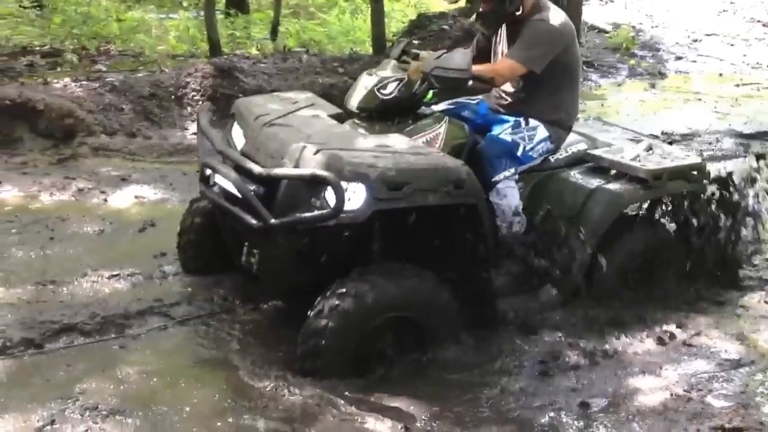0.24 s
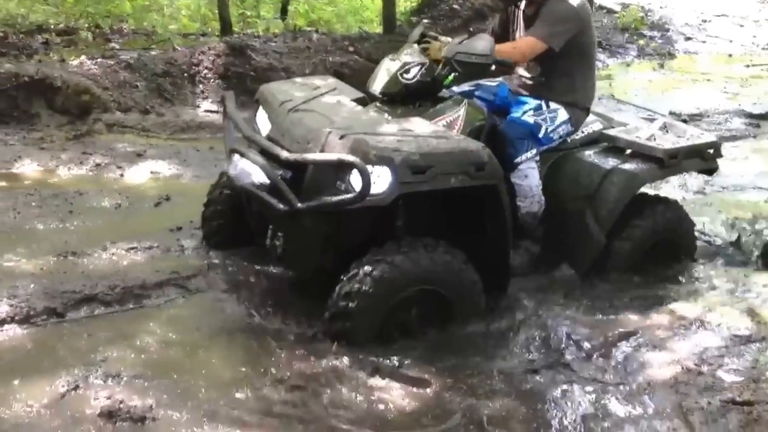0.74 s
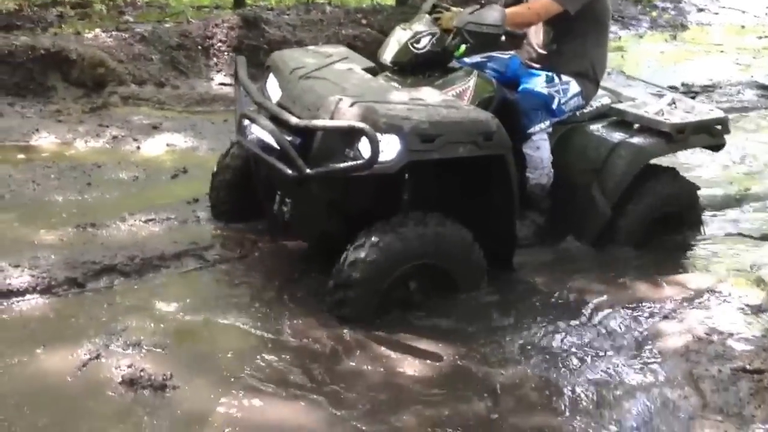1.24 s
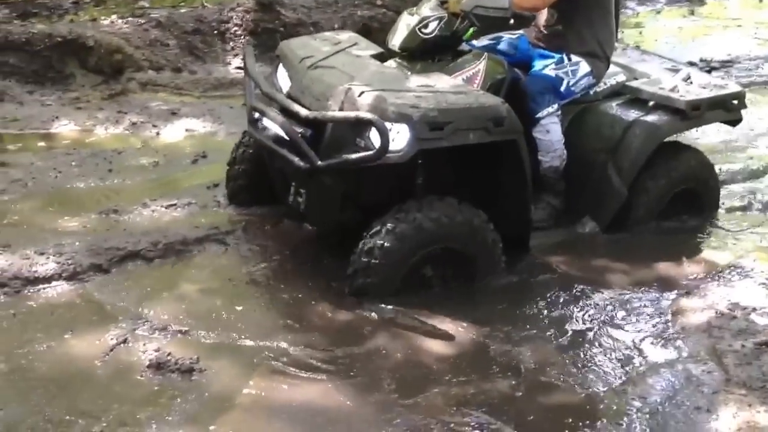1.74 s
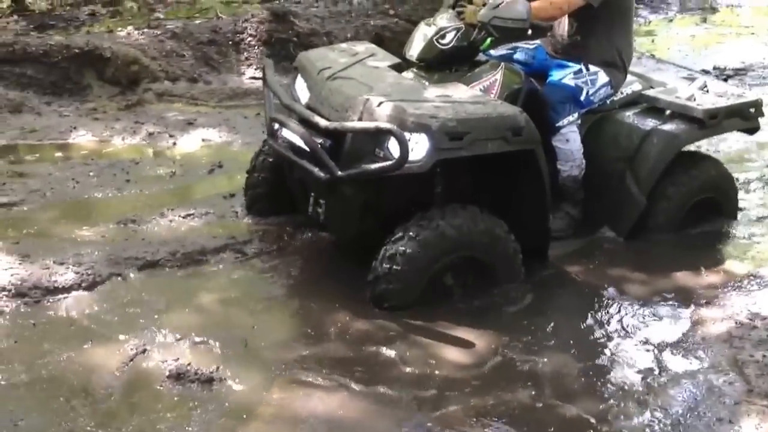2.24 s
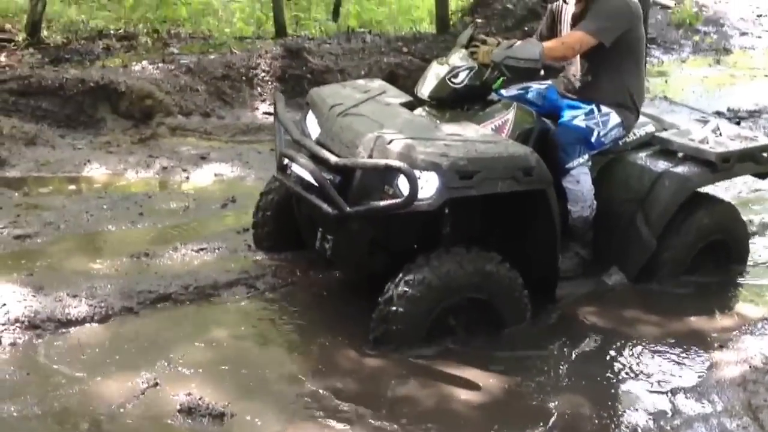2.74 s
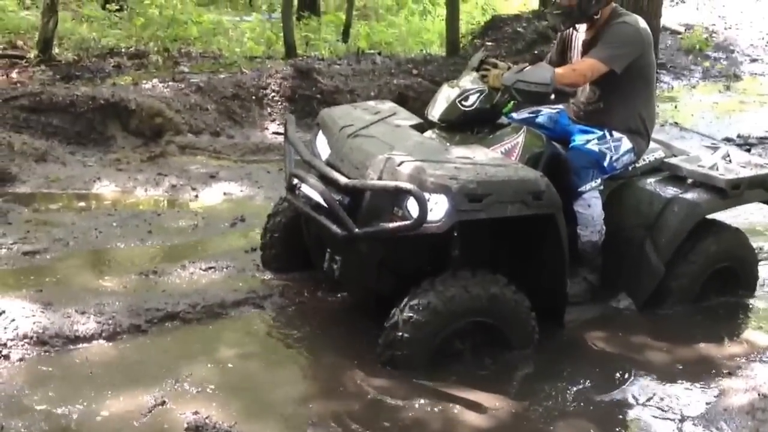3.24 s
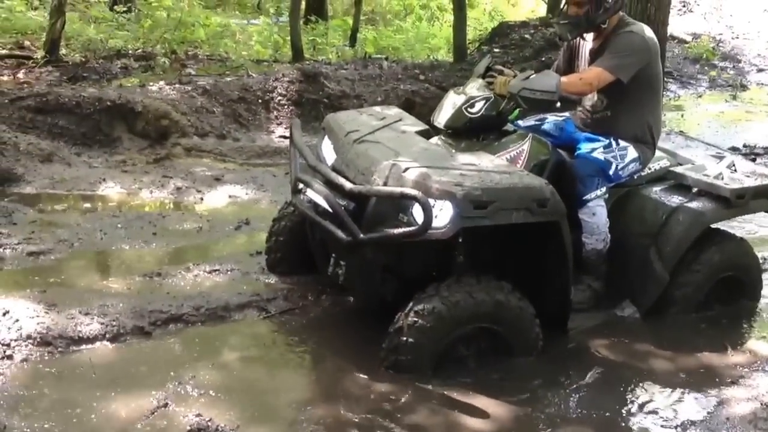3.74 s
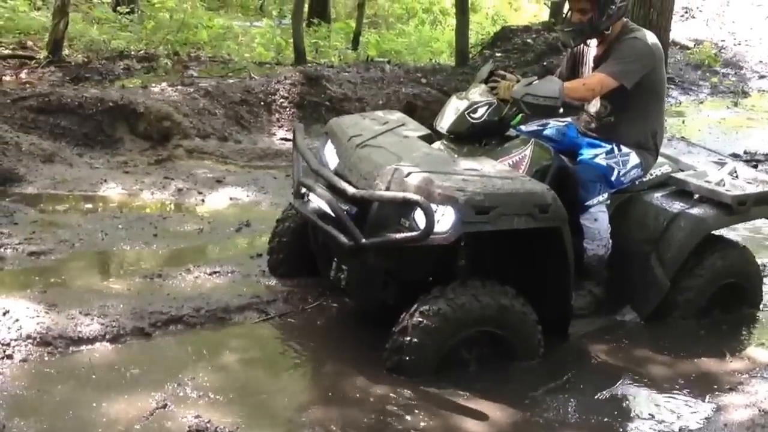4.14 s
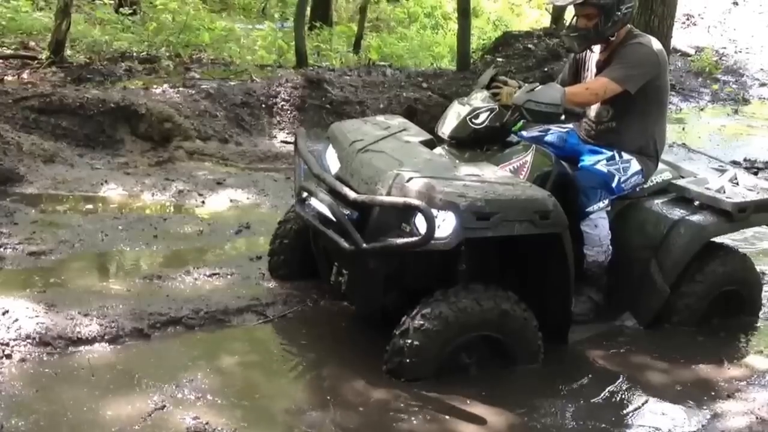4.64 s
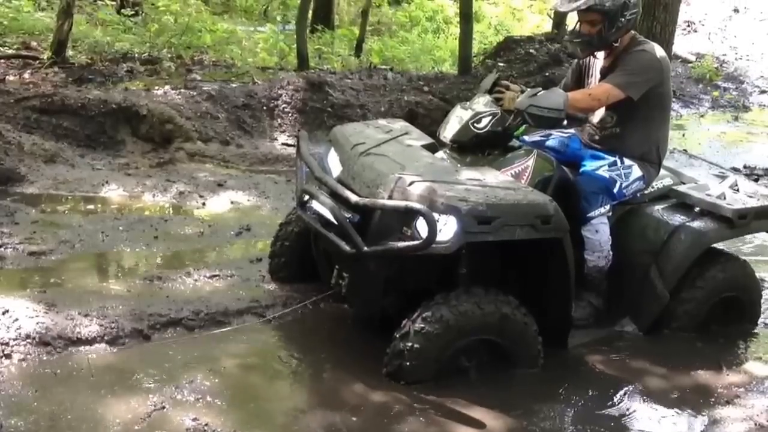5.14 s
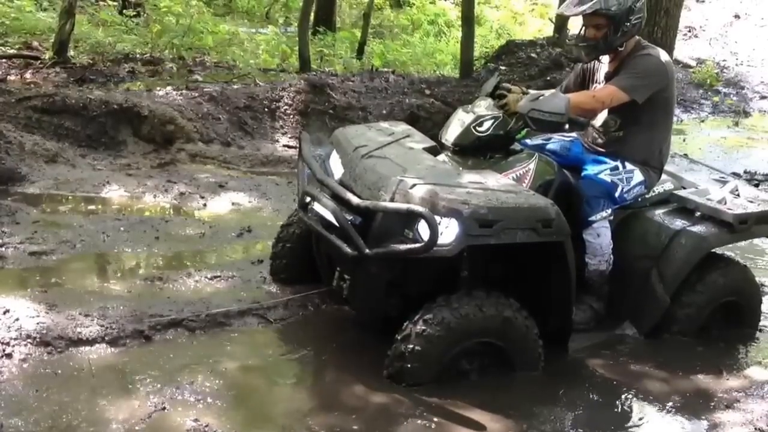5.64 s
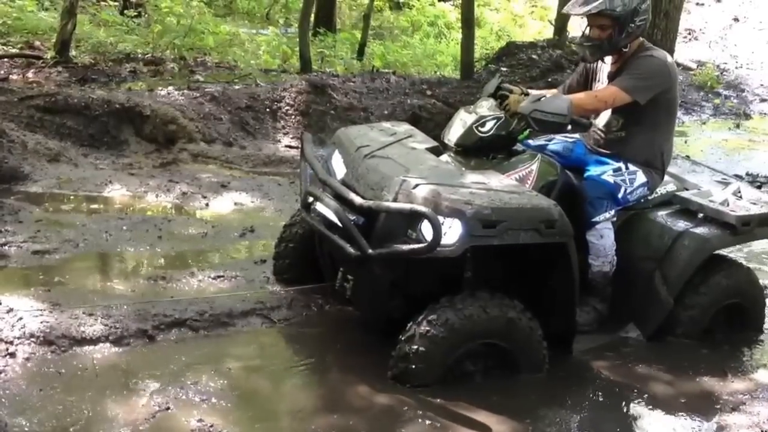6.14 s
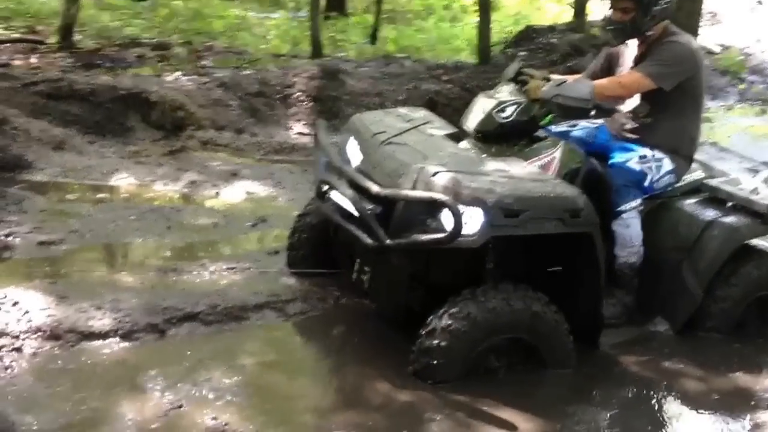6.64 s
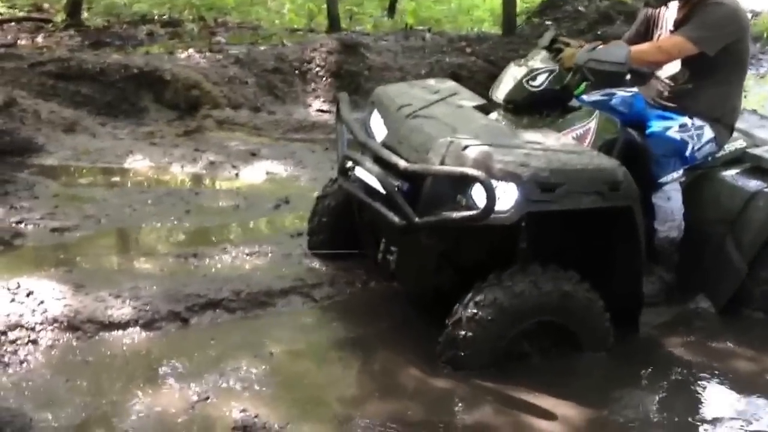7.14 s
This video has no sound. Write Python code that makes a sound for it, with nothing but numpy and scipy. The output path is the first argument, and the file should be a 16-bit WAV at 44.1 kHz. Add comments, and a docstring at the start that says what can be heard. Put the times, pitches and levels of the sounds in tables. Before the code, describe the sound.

A quad's single-cylinder engine revs in bursts through sloshing mud, sinks to a quiet idle, then revs up again.

```python
"""A quad's single-cylinder four-stroke is blipped several times in a mud hole, sinks to idle and revs again.
Exhaust and intake strokes thump through muffler and airbox; case and belt drive clatter with speed.
The wet belt chirps at the start, and a cooling fan rushes and whines underneath.
Water sloshes, thrown mud patters back, and a hollow low-mid rush swells and fades behind it all."""
import sys
import numpy as np
from scipy import signal
from scipy.fft import rfft, irfft, next_fast_len
from scipy.io import wavfile

SR = 44100
rng = np.random.default_rng(int(sys.argv[2]) if len(sys.argv) > 2 else 0)


def materialize(psi):
    """Save the field psi as 16-bit PCM at rate SR to the path in sys.argv[1].

    A 1-D psi becomes a single channel; in a 2-D psi each row is a channel.
    """
    bounded = np.clip(np.atleast_2d(psi).T, -1, 1)
    quanta = np.round(bounded * 32767).astype(np.int16)
    wavfile.write(sys.argv[1], SR, quanta)


N = 325899
TIME = np.arange(N) / SR
BINS = next_fast_len(N)
HZ = np.maximum(np.arange(BINS + 1) * SR / (2 * BINS), 1)
CRUISE_SPEED, FULL_SPEED = 30, 65   # all speeds are in engine cycles/s


# throttle blips: (open t/s, shut t/s, target speed/(cycles/s), coasting time constant/s)
THROTTLE_BLIPS = [(.859, 1.311, 65.0, .564), (2.144, 2.506, 63.7, .667), (2.815, 3.02, 47.5, .493),
                  (3.116, 3.225, 74.5, 1.05), (3.372, 3.803, 17.3, .684), (6.767, 7.45, 52.6, .6)]

def flywheel(start_speed=48.265, coast_aim=4.148, spin_up_s=.624, first_coast_s=.483):
    """Speed chases the throttle, then coasts to idle. Gives speed, open or shut, and opening (0-1)."""
    idle = 8.021 + .202 * np.cos(2 * np.pi * .787 * (TIME - 5.555))   # the idle hunts slowly
    speed, is_open, opening = np.full(N, start_speed), np.zeros(N), np.zeros(N)
    moves = [(0.0015, coast_aim, first_coast_s)]
    for opens, shuts, aim, coast_s in THROTTLE_BLIPS:
        moves += [(opens, aim, spin_up_s), (shuts, coast_aim, coast_s)]
        held = (TIME >= opens) & (TIME < shuts)
        is_open[held], opening[held] = 1, min(aim / FULL_SPEED, 1)
    for s, aim, seconds in moves:
        at = min(int(s * SR), N - 1)
        speed[at:] = np.maximum(idle[at:], aim + (speed[at] - aim) * np.exp(-TIME[:N - at] / seconds))
    return speed, is_open, opening


# punch of the gas pulses: (speed/(cycles/s), shut level/dB, wide-open level/dB, late-pulse share 0-1)
PUNCH_BY_SPEED = [(7.86, -40.5, -29, .1), (12, -34.5, -22, 0.1), (17.7, -29, -24.5, 0.2),
                  (24.1, -23, -20.5, 1), (29.6, -21, -23, 1), (32.8, -19, -15, 0.24),
                  (41, -19.5, -13, 0.42), (48, -9.5, -12, .25)]
# weak firing on the run-down: (t/s, dip/dB, half length/s)
WEAK_SPELLS = [(0.822, 3.5, 0.087), (4.694, 11, 0.11)]

def effort(speed, burn, load):
    """Gas pulse level in dB, softened by belt load and weak firing, and the share of late pulses."""
    speeds, *columns = np.transpose(PUNCH_BY_SPEED)
    shut_db, open_db, late = (np.interp(speed, speeds, c) for c in columns)
    weak_db = sum(dip * np.exp(-((TIME - s) / half) ** 2) for s, dip, half in WEAK_SPELLS)
    return (1 - burn) * shut_db + burn * open_db - 3.5 * load ** 2 - weak_db, late


# gas pulses of one cycle: (place/cycles, push with throttle shut, push added by full throttle)
GAS_PULSES = [(-.06, 1., -.35), (.055, .55, -.55), (.2, .45, -.45), (.32, 0., .75), (.535, 0., .55)]
# boomy body of muffler and airbox: (f/Hz, level/dB)
PIPE_EQ = [(25, -39.5), (55, -38), (75, -15), (105, -1), (180, 4), (260, 2), (310, -1.5), (380, -15.5),
           (470, -54), (900, -52.5)]
# their resonances: (f/Hz, width/Hz, boost/dB)
PIPE_PEAKS = [(123, 25, 1.5), (163, 29, 3.5), (196.4, 48, 5.5), (256, 29, 5)]

def exhaust(crank, speed, throttle, effort_db):
    """Gas pulses ring the pipes; an open throttle adds pulses later in the cycle."""
    pulses, power = 0, 0
    for place, shut, added in GAS_PULSES:
        push = shut + added * throttle
        pulses = pulses + push * once_a_cycle(crank, place, spread_db=1, jitter_s=.0001)
        power = power + push ** 2
    # each pulse trails a turbulent puff: burbling with the throttle shut, cleaner when open
    puffs = lag(np.abs(pulses), .014) * rng.standard_normal(N)
    turbulence = .33 - .2 * np.clip(throttle, 0, 1)
    # the muffler sings briefly ahead of each main pulse
    ringing = resonate(once_a_cycle(crank, .62, spread_db=4, jitter_s=.0002), hz=262, width=26)
    strength = np.sqrt(power * speed)
    gas = rms_one(pulses / strength) + turbulence * rms_one(puffs / strength)
    gas += .046 * rms_one(ringing / np.sqrt(speed))
    return colour(gas * from_db(effort_db), PIPE_EQ, PIPE_PEAKS) / np.std(colour(gas, PIPE_EQ, PIPE_PEAKS))


def drone(crank, speed, pipe_hz, width_hz):
    """Engine orders swell in turn as they glide through a pipe resonance."""
    orders = np.arange(2, 17)[:, None]
    gains = 1 / (1 + (2 * (orders * speed - pipe_hz) / width_hz) ** 2) ** 3.7
    partials = gains * np.cos(2 * np.pi * orders * (crank - .33))
    return np.sqrt(2) * partials.sum(axis=0) / np.sqrt((gains ** 2).sum(axis=0))


def pipes(crank, speed, burn, load, flow):
    """Muffler and airbox blend thump with two droning notes that come forward under load."""
    effort_db, late = effort(speed, burn, load)
    thump = exhaust(crank, speed, late * flow, effort_db)
    low_note = drone(crank, speed, pipe_hz=118.6, width_hz=69)
    upper_note = from_db(-6) * drone(crank, speed, pipe_hz=229, width_hz=58)
    capped = np.minimum(speed, CRUISE_SPEED), burn, load
    share = from_db(level_db(capped, cruise_db=-10, octave_db=6, throttle_db=-6, load_db=8.5))
    hum = share * from_db(effort_db) * (low_note + upper_note)
    return (thump + hum) / np.sqrt(1 + share ** 2)


def clatter(crank, speed, knock_share, swell):
    """Valves, piston and drive knock at set places in the cycle, over rubbing that swells once a cycle."""
    places = (-.03, .12, .22, .31, .52, .72)
    knocks = sum(once_a_cycle(crank, place, spread_db=4, jitter_s=.00004) for place in places)
    rubbing = rng.standard_normal(N) * (1 + swell * np.cos(2 * np.pi * (crank - .15)))
    knocks = scatter(knocks / np.sqrt(speed), t60=.041, share=18)
    return rms_one(rubbing + knock_share * rms_one(knocks))


# broad ring of case, frame and covers: (f/Hz, level/dB)
CASE_EQ = [(60, -26), (200, 4.5), (350, 7.5), (480, -5), (640, 5.5), (900, -3), (1130, -0.5), (1400, 0.5),
           (1850, 1), (2600, -7), (3300, -0.5), (3800, -11), (4600, -28), (8000, -29.5)]
# their resonances: (f/Hz, width/Hz, boost/dB)
CASE_PEAKS = [(674, 50, -1.5), (856, 80, 11), (960, 61, 8.5), (1291, 31, 10), (1526, 55, 7.5),
              (2137, 50, 9), (2616, 280, 9), (2916, 21, 10)]

def engine_case(crank, speed):
    """The clatter rings through case, frame and covers."""
    return rms_one(colour(clatter(crank, speed, knock_share=.63, swell=.11), CASE_EQ, CASE_PEAKS))


def piston_slap(crank):
    """A dull knock after each firing, heard mostly at idle."""
    knocks = scatter(once_a_cycle(crank, .1, spread_db=2.5, jitter_s=.0005), t60=.12, share=8.2)
    return from_db(-45.5) * rms_one(resonate(knocks, hz=950, width=120))


# singing modes of the belt housing: (f/Hz, width/Hz, relative level/dB)
HOUSING_MODES = [(1312, 81, -17), (2462, 41, -1), (2485, 29, -12), (2550, 19, 4)]

def belt_housing(crank, speed):
    """Friction in the drive makes the housing sing."""
    friction = clatter(crank, speed, knock_share=.41, swell=.34)
    return rms_one(sum(from_db(db) * resonate(friction, hz, width) for hz, width, db in HOUSING_MODES))


# slips of the wet belt: (t/s, length/s, starting f/Hz, level/dB)
BELT_SLIPS = [(-.04, 0.16, 1073, -17.5), (.195, .11, 920, -27)]

def belt_chirps(end_hz=710, sag_s=.05):
    """Each slip of the wet belt swells, flutters and fades while its pitch sags."""
    chirps = 0
    for s, length, hz, db in BELT_SLIPS:
        age = np.clip(TIME - s, 0, length)
        pitch = end_hz + (hz - end_hz) * np.exp(-age / sag_s)
        envelope = from_db(db + 3 * drift(24)) * np.sin(np.pi * age / length) ** 2
        chirps = chirps + envelope * tone(pitch, waver=.018)
    return chirps


# water sloshing round the wheels: (t/s, level/dB, decay/s)
WHEEL_SLOSHES = [(.57, -31, 0.65), (.69, -39, .3), (1.87, -43, 1.5), (2.28, -36, 0.57), (3.52, -39, .7),
                 (3.835, -35, 0.49), (4.0, -40, .7), (6.6, -36.5, 0.72), (6.79, -34, 1.7),
                 (7.06, -34, 0.77), (7.27, -30, 1.4)]
# bright, wet sizzle: (f/Hz, level/dB)
HISS_EQ = [(2500, -15.5), (3800, -4), (5000, 2.5), (5900, 3), (7600, -5), (9000, -12.5), (10600, -31),
           (12300, -17.5), (15000, -23)]

def wet_hiss(crank, speed, running_db, idle_db=-41):
    """The wet chain hisses even at idle; speed and sloshing water lift the hiss."""
    wetness = np.sqrt(from_db(running_db) ** 2 + from_db(idle_db) ** 2 + dying(WHEEL_SLOSHES) ** 2)
    return wetness * rms_one(colour(clatter(crank, speed, knock_share=.86, swell=.084), HISS_EQ))


# airy bed of the fan: (f/Hz, level/dB)
FAN_EQ = [(40, -38), (90, -2), (230, -8), (330, -8.5), (430, -30.5), (540, -17), (680, -11.5), (930, 0),
          (1350, -10.5), (1650, -8), (2600, -6.5), (3300, -4), (3950, -10.5), (5800, -9), (8000, -18),
          (10500, -33.5), (12500, -34), (15000, -52)]
# shroud and radiator resonances: (f/Hz, width/Hz, boost/dB)
SHROUD_PEAKS = [(707, 65, 9), (965, 120, 5.5), (1226, 63, 9.5), (2080, 140, 6), (2396, 73, 8),
                (3070, 92, 6.5), (3386, 92, 8.5), (6080, 29, 13)]
# thin whine of the fan motor: (t/s, f/Hz, level/dB)
MOTOR_WHINE = [(0, 1480, -56), (1.8, 1486, -45), (4.2, 1480, -44), (4.7, 1450, -44.5), (5.1, 1462, -47.5),
               (6.2, 1442, -48.5), (6.7, 1440, -56), (7.39, 1460, -46)]

def cooling_fan():
    """Air rushes steadily through shroud and radiator while the motor whines."""
    rush = from_db(-34.5) * rms_one(colour(rng.standard_normal(N), FAN_EQ, SHROUD_PEAKS))
    whine_hz, whine_db = in_time(MOTOR_WHINE)
    return rush + from_db(whine_db) * tone(whine_hz, waver=.0027)


# clods landing: (t/s, relative level/dB, decay/s)
CLODS = [(.572, -18, 0.27), (.664, -21, 0.33), (.885, -21, .07), (1.635, -20, .025), (2.068, -16, 0.027)]
# wet smack of the mud: (f/Hz, level/dB)
MUD_EQ = [(500, -2), (1000, 8.5), (3000, 5.5), (6000, -11), (8000, 0), (10500, -16), (15000, -9)]

def mud(thrown_db, drops_per_s=1100):
    """Small drops thrown by the wheels patter at random; big clods burst into a short spray."""
    shower = from_db(-33.5 - 14 * TIME)   # mud already in the air comes down and fades
    drops = rms_one(rng.standard_normal(N) * (rng.random(N) < drops_per_s / SR))
    bursts = lag(dying(CLODS), .005) * rng.standard_normal(N)
    return colour(drops * (from_db(thrown_db) + shower) + .5 * bursts, MUD_EQ)


# swells of the hollow rush: (t/s, level/dB)
HOLLOW_FADER = [(0, -39), (.7, -47.5), (1.3, -32.5), (1.9, -59), (2.5, -30.5), (3.1, -51), (4, -80),
                (6.7, -55), (7.39, -34)]
# its low-mid body: (f/Hz, level/dB)
HOLLOW_EQ = [(150, -44), (320, 10.5), (410, 0.5), (520, -2), (700, -8.5), (1500, -39)]

def hollow_rush():
    """A hollow low-mid rush around 320 Hz swells and fades in uneven surges."""
    surges = rng.standard_normal(N) * from_db(6.2 * drift(23))
    return from_db(in_time(HOLLOW_FADER)[0]) * rms_one(colour(surges, HOLLOW_EQ))


def once_a_cycle(crank, place, spread_db, jitter_s):
    """A click whenever the crank passes a place in the cycle, each a little different."""
    at = np.flatnonzero(np.diff(np.floor(crank - place)) > 0)
    accent, timing = rng.standard_normal((400, 2))[:len(at)].T
    clicks = np.zeros(N)
    clicks[np.clip(at + (timing * jitter_s * SR).astype(int), 0, N - 1)] = from_db(spread_db * accent)
    return clicks


def scatter(x, t60, share):
    """Frame and plastic covers add a short tail of dense reflections."""
    tail = rng.standard_normal(SR // 20) * from_db(-60 * TIME[:SR // 20] / t60)
    return x + share * signal.fftconvolve(x, tail / np.sqrt(np.sum(tail ** 2)))[:N]


def colour(x, spectrum, peaks=()):
    """Minimum-phase EQ: a broad curve with resonances standing on it."""
    hz, db = np.transpose(spectrum)
    level = np.interp(np.log(HZ), np.log(hz), db)
    for centre, width, height in peaks:
        level += height / (1 + (2 * (HZ - centre) / width) ** 2)
    cepstrum = irfft(np.log(from_db(level)))
    cepstrum[1:BINS] *= 2
    cepstrum[BINS + 1:] = 0
    return irfft(rfft(x, 2 * BINS) * np.exp(rfft(cepstrum)))[:N]


def resonate(x, hz, width):
    """One resonance with unity gain at its peak."""
    r = np.exp(-np.pi * width / SR)
    poles = [1, -2 * r * np.cos(2 * np.pi * hz / SR), r * r]
    return signal.lfilter(np.array([1, 0, -1]) * (1 - r * r) / 2, poles, x + 1e-18)


def level_db(state, cruise_db, octave_db, throttle_db, load_db):
    """A fader that follows octaves of speed from cruising, throttle and belt load."""
    speed, burn, load = state
    return cruise_db + octave_db * np.log2(speed / CRUISE_SPEED) + throttle_db * burn + load_db * load


def tone(hz, waver):
    """A wavering sine of unit power."""
    return np.sqrt(2) * np.sin(2 * np.pi * np.cumsum(hz * (1 + waver * drift(90))) / SR)


def dying(rows):
    """Envelope of sudden hits, each falling 60 dB in its decay time."""
    return sum(from_db(db - 60 * np.maximum(TIME - s, 0) / decay) * (TIME >= s) for s, db, decay in rows)


def lag(x, seconds):
    """Follow a control with a time constant."""
    keep = np.exp(-1 / (seconds * SR))
    return signal.lfilter([1 - keep], [1, -keep], x + 1e-18)


def drift(rate):
    """Random wander with a spread of about 1."""
    return np.interp(TIME * rate, np.arange(8000), rng.standard_normal(8000))


def in_time(rows):
    """Each column of an automation curve at every sample."""
    s, *columns = np.transpose(rows)
    return [np.interp(TIME, s, c) for c in columns]


def from_db(db):
    """Decibels to gain."""
    return 10 ** (np.asarray(db) / 20)


def rms_one(x):
    """Scale to unit power."""
    return x / np.sqrt(np.mean(x ** 2) + 1e-20)


# drag of the mud on the drive belt: (t/s, load 0-1)
MUD_DRAG = [(0, 0.24), (.85, 0), (1.1, 0.81), (1.75, 0.37), (2.2, 0), (2.45, 0.44), (2.9, .85), (3.35, 1),
            (3.7, 1), (3.9, 0.52), (4.4, 0.15), (7.39, 0.4)]
# the quad rocks away from the listener and back: (t/s, level/dB)
ROCKING_FADER = [(0, -1.5), (1.3, 0.1), (3.2, -0.3), (7.0, 0.47), (7.39, 1.5)]

def scene():
    """The flywheel times every pulse and knock and rides their levels; fan, mud and rush sit behind."""
    speed, is_open, opening = flywheel()
    crank = np.cumsum(speed) / SR
    burn, flow = lag(opening, .011), lag(is_open, .043)   # gas flow trails the throttle more than the burn
    load = in_time(MUD_DRAG)[0]
    state = speed, burn, load
    clatter_db = level_db(state, cruise_db=-22.5, octave_db=13, throttle_db=5.5, load_db=-2.5)
    housing_db = level_db(state, cruise_db=-16.5, octave_db=-1, throttle_db=-2.5, load_db=10)
    hiss_db = level_db(state, cruise_db=-38.5, octave_db=12, throttle_db=5.5, load_db=-1.2)
    thrown_db = level_db(state, cruise_db=-45, octave_db=5, throttle_db=-8, load_db=0)
    quad = pipes(crank, speed, burn, load, flow)
    quad += from_db(clatter_db - 3.5) * engine_case(crank, speed)
    quad += from_db(clatter_db + housing_db) * belt_housing(crank, speed)
    quad += wet_hiss(crank, speed, hiss_db) + cooling_fan() + belt_chirps() + piston_slap(crank)
    quad *= from_db(in_time(ROCKING_FADER)[0])
    return (quad + hollow_rush() + mud(thrown_db))[None]


def record(dry):
    """Soft saturation rounds the peaks; a steep high cut sits at 15.2 kHz."""
    rounded = 1.6 * np.tanh(dry / 1.6)
    high_cut = np.clip((15200 - HZ) / 200 + 1, 0, 1)
    return irfft(rfft(rounded, 2 * BINS) * high_cut)[:, :N]


dry = scene()
out = record(dry)
materialize(out)
```